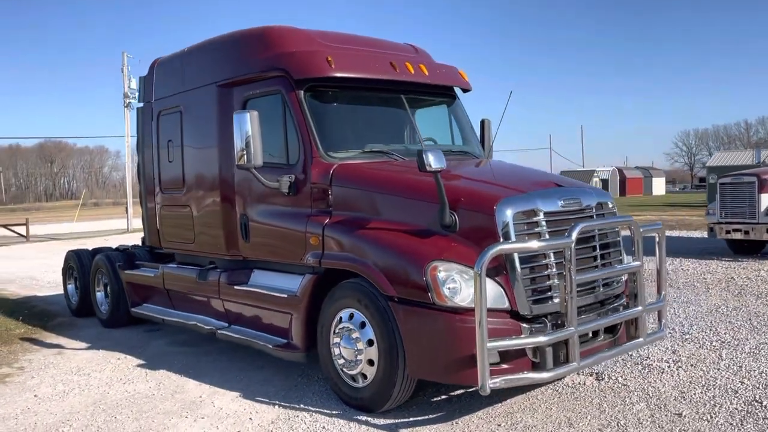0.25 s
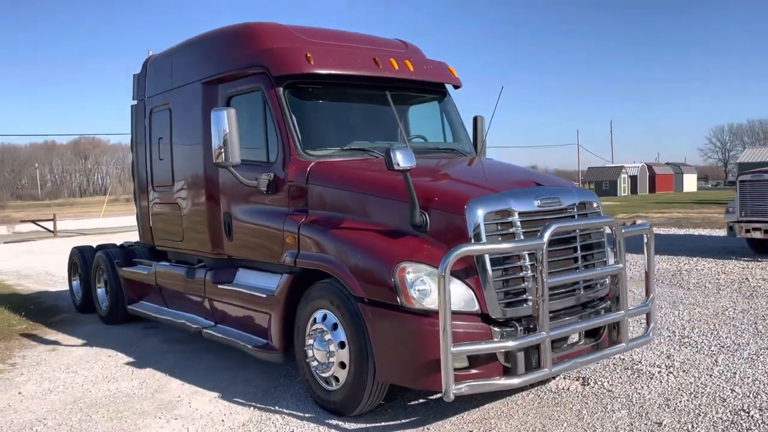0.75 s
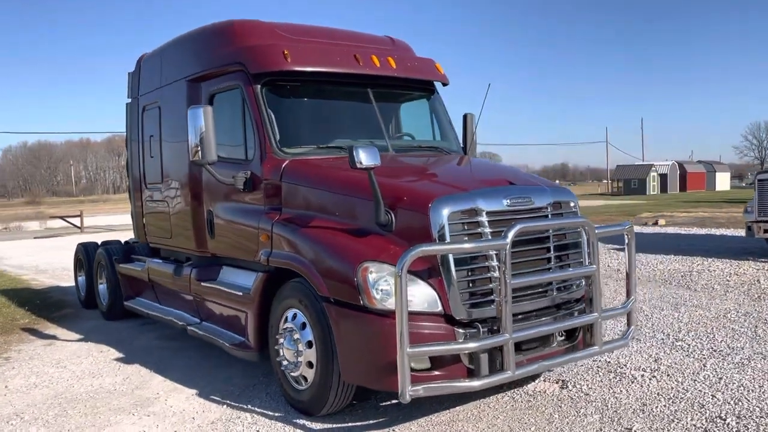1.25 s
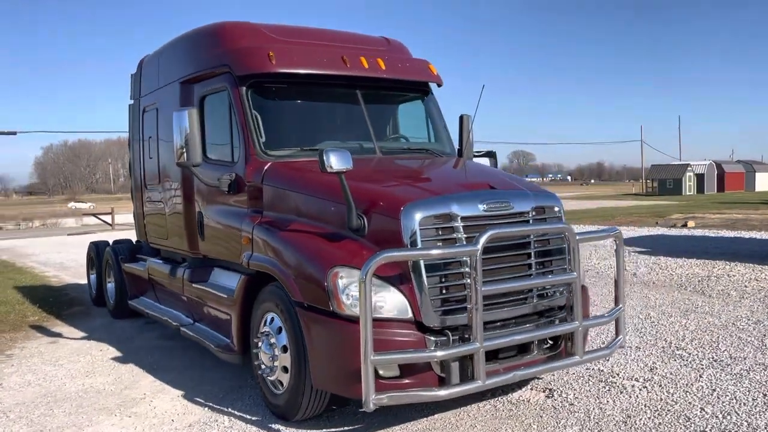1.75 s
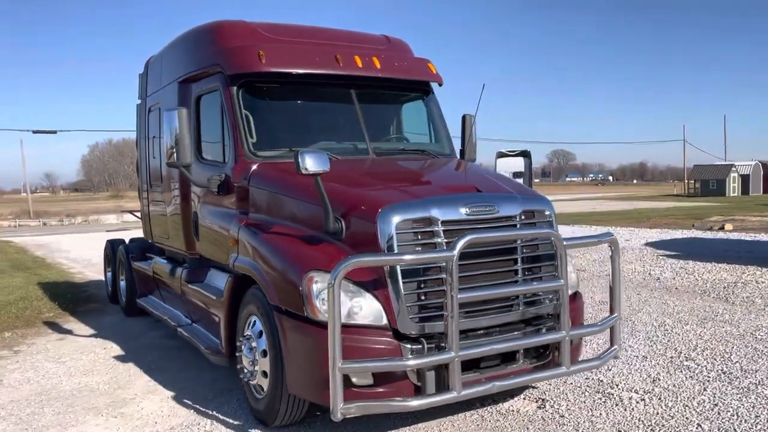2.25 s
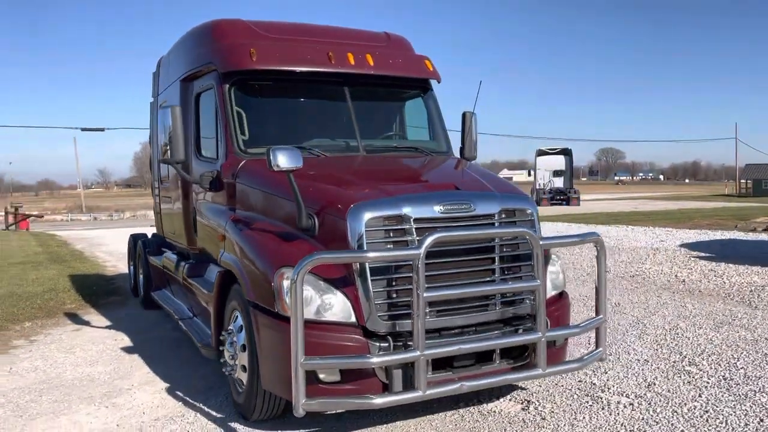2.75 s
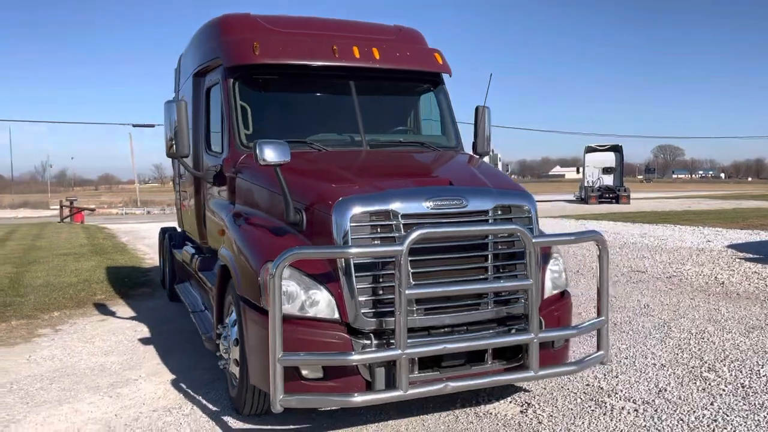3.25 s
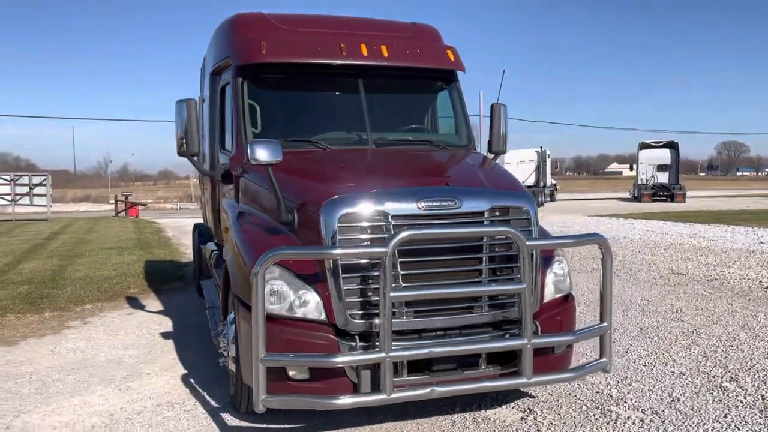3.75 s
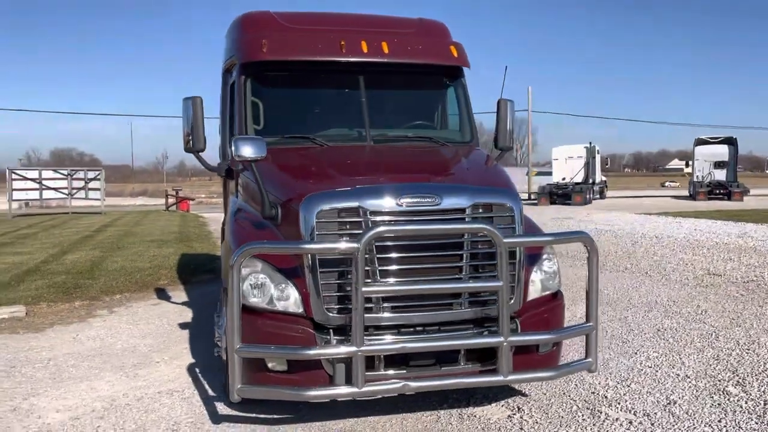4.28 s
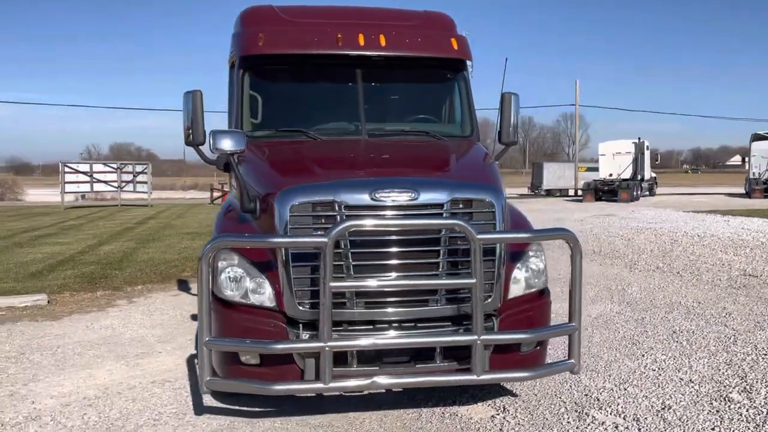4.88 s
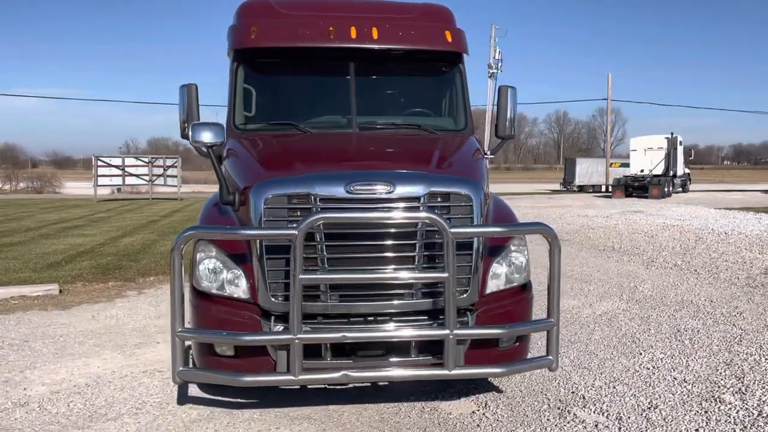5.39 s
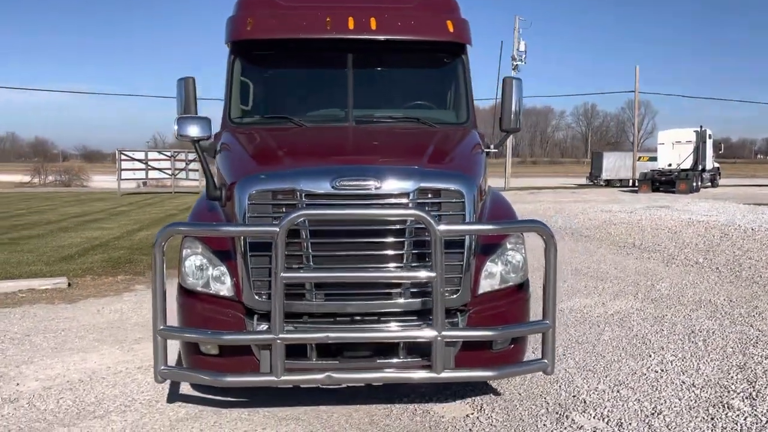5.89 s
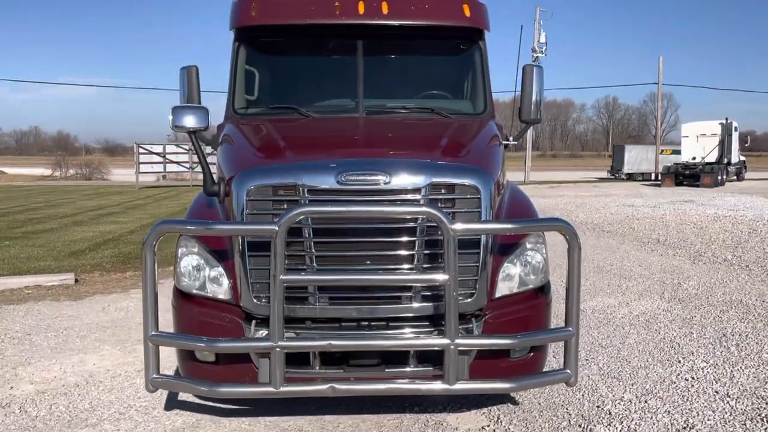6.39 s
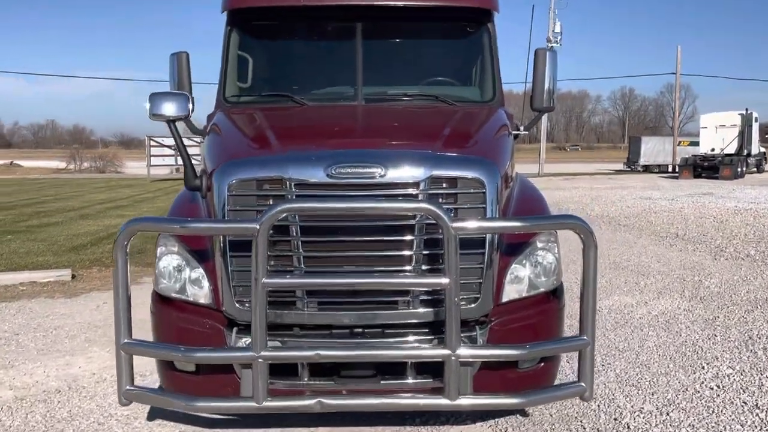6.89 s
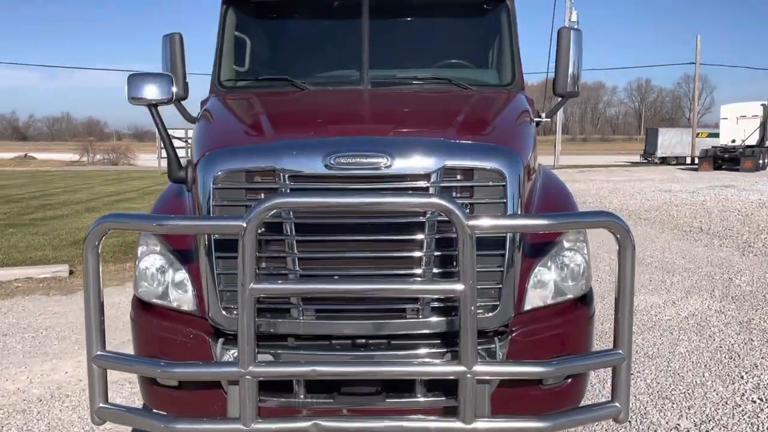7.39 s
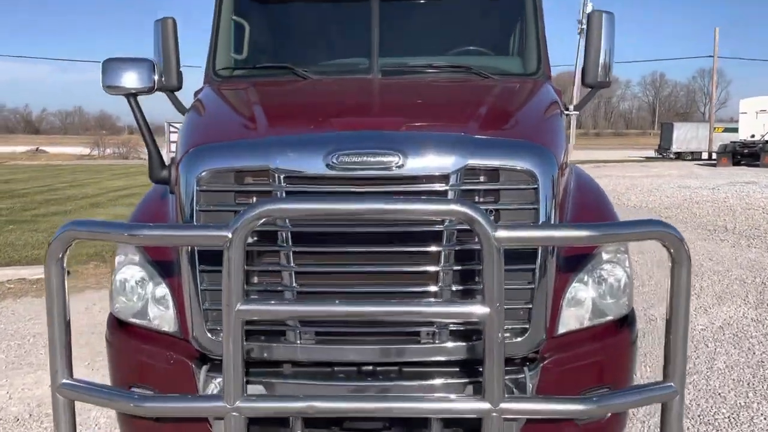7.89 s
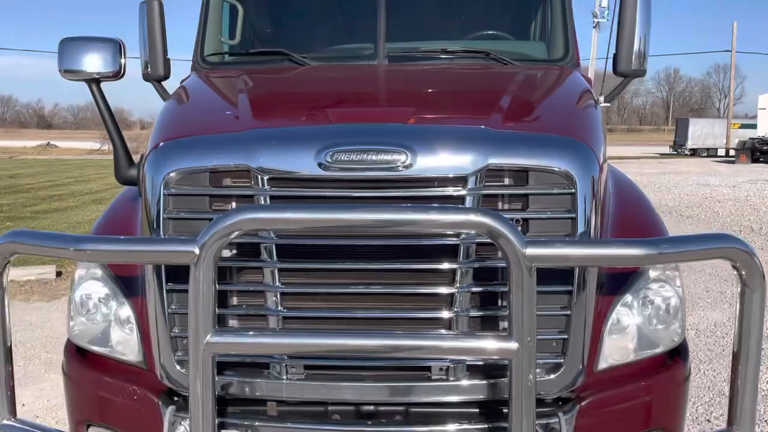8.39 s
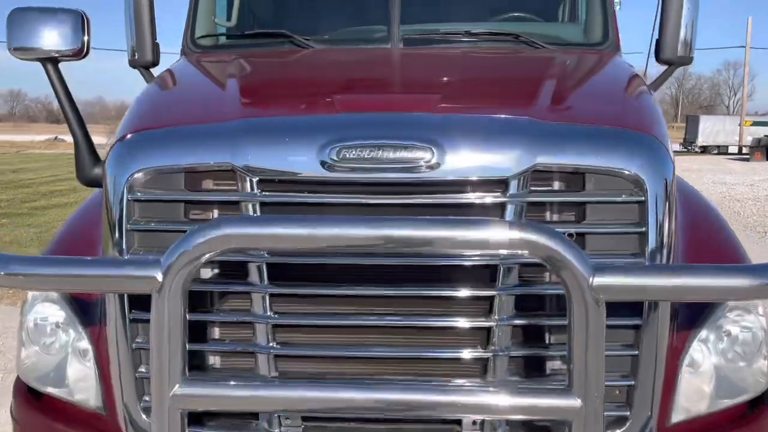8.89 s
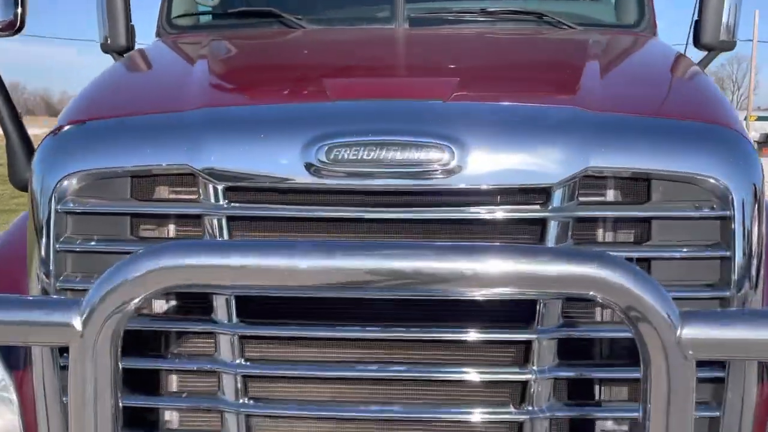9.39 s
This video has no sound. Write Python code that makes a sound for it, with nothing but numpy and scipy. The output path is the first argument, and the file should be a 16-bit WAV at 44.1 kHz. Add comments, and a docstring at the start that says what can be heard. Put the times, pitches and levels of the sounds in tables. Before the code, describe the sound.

Outdoors, short gusts of wind rumble and thump on a hand-held microphone while a big diesel truck engine idles at a constant speed. Its fast metallic clatter sits on a rushing fan noise and a low hum, with faint ticking and small high squeaks. As the microphone comes around to the front and nears the grille, the knocking gets louder and a high hiss builds.

```python
"""A hard diesel knock, thirty firings a second: a six-cylinder truck idling on an open lot,
heard on a hand-held microphone pair that walks from its side up to the grille. Each firing rings
the engine block; under it lie fan and gear roar, a belt squeak, injector ticks, an exhaust hum,
a thin drone and turbo hiss. A light wind buffets the microphones in short gusts."""
import sys
import numpy as np
from scipy import signal
from scipy.fft import rfft, irfft, next_fast_len
from scipy.io import wavfile
from scipy.ndimage import uniform_filter1d

SR = 44100
rng = np.random.default_rng(int(sys.argv[2]) if len(sys.argv) > 2 else 0)


def pcm_store(signal):
    """Save signal as 16-bit PCM."""
    levels = np.round(np.clip(np.atleast_2d(signal), -1, 1) * 32767)
    wavfile.write(sys.argv[1], SR, levels.astype(np.int16).T)


N = 425105
T = np.arange(N) / SR
FFT_SIZE = next_fast_len(N)
BIN_HZ = np.fft.rfftfreq(FFT_SIZE, 1 / SR)

# the idling engine: (time [s], firings so far [count])
FIRING_COUNT = [(0, .28), (3.3, 99.45), (5.7, 171.445), (6.3, 189.48), (7.2, 216.55), (9.64, 289.99)]
# the walk: (time [s], nearness [dB], view [0 at the side, 1 in front, 2 close to the grille])
MIC_WALK = [(0, -24, 0.055), (.7, -23.5, 0.071), (2, -23.5, 0.067), (3, -23.5, 0.38), (4, -22.5, 0.61),
            (5, -23, 0.83), (6, -21.5, 1), (7, -21.5, 1.4), (7.7, -19.5, 1.6), (8.3, -18.5, 2.2),
            (8.9, -18, 1.94), (9.64, -17.5, 1.3)]
# engine block modes: (pitch [Hz], width [Hz], lag [s], level at each of 3 views [dB],
# 6 cylinder weights from the side [dB], 6 from the front [dB])
BLOCK_MODES = [(618, 26, 0.00064, -23.5, -5, -6, -4, -8, 4, -3.5, 9.5, -7, -5.5, -0.5, -3.5, 3.5, -2.5, -1.5),
               (712, 45.7, 0.0025, -10.5, -12, -15.5, -3.5, 3.5, -1, 4, -2.5, 1, 0.5, -8, 3, -2.5, 4.5, 13),
               (795, 53, 0.0023, -17.5, -26, -22, -11, 5, -2, -1, -3, -1.5, -1, 5, 0, -4, -5, -4),
               (884, 21.78, .001, -22.5, -17, -9.5, 4, -1, 2, -3, 4, 2, 1, 7.5, -10, -6, 5, -3),
               (982, 29.8, 0.0024, -17, -6, -5, -8, 6, -13, 4, 5, 9.5, -5, -1.5, -3, 1.5, -2.5, 2),
               (1046, 35, 0.001, -20, -6, -3, 6, 3, 3.5, 9, -11, 7.5, 3, -1.5, 0, -4, 0.5, -1),
               (1122, 35, 0.0014, -20.5, -11, -18.5, 5, 2, 5, 3, 1.5, 5, 5, 0, 6.5, 9, -8.5, -8.5),
               (1205, 44, 0.0039, -13.5, -20, -10.5, 3, -6, 11, 0, -3, 7, -4, -9, -3, 10, 4, 12.5),
               (1432, 45, 0.0015, -13, -16, -18, 11, -5, -3, -4, -1, 7, -7, -15, 1, -6, 2, 16.5),
               (1654, 100, 0.0032, -24, -18.5, -18.5, -11, 3, -7, 8, 1, 3, -12, -5, -6, 4, 7, -0.5),
               (1853, 70, .002, -19.5, -19, -19.5, -11, -1, -2, 4, 1, 8, -17, -4, -1, 4.5, 0, 10),
               (2010, 50, 0.0016, -19, -21.5, -26, -4, -10, -3.5, -2, 3.5, 4.5, -5, -3.5, -2, 5, 2, 6),
               (2520, 89.4, 0.0042, -28, -31, -33, -3, 2, 1, 0, 0, 2, 2, 0, 0, 1, -1, 5),
               (3515, 90, 0.0032, -28.5, -34, -35.5, -5, -4, 2, -1, 0, 8.5, -16, -6, 3, 0, 2, 11)]
# fan and gear roar: (frequency [Hz], relative level [dB])
ROAR_SPECTRUM = [(30, -39), (60, -1.5), (150, -4.5), (420, -7.5), (620, 0.5), (800, -0.5), (1050, -3.5),
                 (1500, -6.5), (2050, -12), (2300, -17), (4000, -23.5), (5500, -29), (7000, -37),
                 (9000, -38.5)]
# the clearest belt squeaks: (time [s], level [dB], pitch [Hz])
BELT_SQUEAKS = [(0.1002, -46, 6100), (1.3927, -49, 6090), (1.591, -49, 6200), (1.7619, -49, 5880),
                (2.0657, -44, 6100), (2.1685, -45, 6090), (2.2932, -40, 6050), (2.4566, -40, 6050),
                (2.4972, -43, 6050), (2.9327, -38, 6000), (3.1607, -41, 6020), (3.3248, -46, 6050),
                (3.3882, -45, 6120), (4.6638, -42, 5900), (4.8978, -42, 6030), (5.0554, -44, 5910),
                (5.2909, -35, 6020), (5.5313, -39, 5900), (5.5912, -42, 6060), (5.76, -43, 6020),
                (5.8356, -40, 6090), (5.9888, -40, 6100), (6.7376, -41, 6040), (6.8977, -46, 6100),
                (7.0853, -40, 6070), (7.1916, -40, 6000), (7.2549, -42, 5850), (7.5887, -47, 6300),
                (8.0536, -38, 6200), (8.1933, -35, 6100), (8.3494, -38, 6020), (8.4214, -44, 6030),
                (8.5909, -35, 6000), (8.6577, -34, 6160), (8.751, -42, 6200), (8.7879, -38, 6160),
                (8.8273, -32, 5960), (8.8598, -43, 6100), (8.8922, -30, 6030), (9.0848, -44, 6100),
                (9.2968, -34, 6130), (9.3816, -39, 6000), (9.4464, -37, 6100), (9.5522, -37, 6100)]
# the clearest injector ticks: (time [s], level [dB], pitch [Hz])
INJECTOR_TICKS = [(0.4968, -43, 3560), (0.7622, -38, 3600), (1.1603, -38, 3620), (1.7958, -41, 3210),
                  (1.929, -36, 3650), (2.158, -40, 3490), (2.5566, -49, 3630), (3.5583, -39, 3680),
                  (3.6895, -33, 3430), (4.1599, -39, 3530), (4.3919, -38, 3500), (4.4623, -39, 3430),
                  (4.8604, -36, 3370), (4.9576, -35, 3700), (5.6875, -39, 3550), (5.8865, -41, 3660),
                  (5.9584, -33, 3580), (6.1559, -41, 3520), (6.562, -37, 3730), (6.7575, -31.5, 3505),
                  (7.1911, -40, 3270), (7.2868, -34, 3680), (7.3223, -34, 3560), (7.5532, -38, 3700),
                  (7.8216, -37, 3500), (8.1529, -31, 3550), (8.4926, -35, 3670), (8.5495, -41, 3620),
                  (8.5929, -34, 3400), (8.7261, -36, 3200), (8.8827, -40, 3470), (8.9466, -33, 3160),
                  (9.1551, -27, 3530), (9.3257, -36, 3540), (9.3521, -27.5, 3500), (9.4848, -38, 3580)]
# exhaust tones: (frequency [multiple of the firing rate], relative level [dB])
EXHAUST_ORDERS = [(1.5, -12), (2, 0), (2.5, -11), (3, -12), (4, -15)]
# exhaust hum along the walk: (time [s], level [dB])
EXHAUST_LEVEL = [(0, -39), (1.0, -62), (1.9, -32), (2.35, -43), (2.6, -34), (3.3, -38), (3.45, -40.5),
                 (4.45, -35.5), (5.5, -33.5), (6.9, -36), (7.11, -25.5), (7.28, -24), (7.4, -34),
                 (7.76, -34), (7.89, -26), (9.37, -36), (9.64, -23.5)]
# thin drone beside the truck: (time [s], pitch [Hz], level [dB])
DRONE_TRACK = [(0, 240, -37.5), (1.2, 244.4, -44), (1.7, 236, -47), (3, 246.5, -41), (4, 244, -62),
               (9.64, 247.2, -38)]
# turbo and intake hiss: (frequency [Hz], relative level [dB])
HISS_SPECTRUM = [(5500, -2), (7000, 2.5), (7600, 17), (8300, 6.5), (8950, 18), (9450, -16), (10200, -30),
                 (11400, 1.5), (12050, 7), (12600, -12), (14000, -3), (15500, -69)]
# hiss along the walk: (time [s], level [dB])
HISS_LEVEL = [(0, -46.5), (1.8, -47.5), (2.5, -42), (4, -40.5), (5.5, -40.5), (7, -39), (8.3, -36),
              (9.3, -33), (9.64, -33.5)]
# turbo whistle along the walk: (time [s], level [dB])
WHISTLE_LEVEL = [(0, -56), (2, -54), (2.5, -54), (4.3, -54.5), (5.2, -62), (7, -57), (8.3, -52),
                 (9.64, -52)]
# breeze on the microphones: (time [s], level [dB])
BREEZE_LEVEL = [(0, -30.5), (1, -30), (1.9, -28), (2.2, -35), (2.6, -28), (3.1, -31), (3.4, -37.5),
                (4.5, -33.5), (5.2, -30), (6, -31), (6.3, -60), (6.8, -31.5), (7.6, -43), (8.2, -29),
                (9, -25), (9.3, -53)]
# gusts: (middle time [s], length [s], peak level [dB], sharpness [0-1])
WIND_GUSTS = [(0.5, 0.051, -38, 0.7), (0.916, 0.39, -27.5, 0.86), (1.193, 0.045, -19.5, 0.02),
              (1.362, 0.12, -25, 0.6), (1.576, 0.098, -22, 1), (1.846, 0.3, -23, 0.76),
              (2.073, 0.019, -19, 0.93), (2.177, 0.055, -32, 0.9), (2.67, 0.087, -20, 0.33),
              (2.9, 0.24, -26.5, 0.46), (3.238, 0.13, -20, 0.9), (3.268, .07, -20.5, 0.2),
              (3.798, 0.062, -23.5, 0.4), (3.94, 0.15, -26, 0.45), (4.092, 0.046, -27, 0.7),
              (4.79, 0.21, -24.5, 0.65), (4.98, 0.11, -17, 0.96), (5.3, 0.077, -23, 0.87),
              (5.39, 0.079, -22, 0.7), (5.603, 0.075, -21, 0.1), (5.954, 0.14, -18, 0.87),
              (6.084, 0.15, -26, 0.6), (6.554, 0.081, -22, 0.2), (6.667, 0.1, -23, 0.4),
              (7.065, 0.06, -23, 0.06), (7.2, .05, -32, 0.3), (7.254, 0.054, -24, 0.1),
              (7.312, 0.048, -17.5, .4), (7.356, 0.16, -23.5, 1), (7.48, 0.051, -24, 0.25),
              (7.936, 0.13, -28, 1), (8.074, 0.039, -19.5, 0.23), (8.158, 0.024, -12, 0),
              (8.275, 0.05, -23, .6), (8.477, 0.039, -22.5, 0.6), (8.66, 0.24, -23.5, 0.6),
              (8.743, 0.3, -21.5, 0.95), (9.012, 0.15, -19, 0.77), (9.568, 0.28, -29.5, 1)]
# dull and sharp wind: (frequency [Hz], relative level [dB])
DULL_WIND_SPECTRUM = [(25, -13), (50, 6), (80, 8.5), (140, -6), (300, -29), (700, -81)]
SHARP_WIND_SPECTRUM = [(25, -26), (50, -23), (120, 2.5), (300, 3), (500, -5.5), (900, -7.5), (1500, -77)]
# the strongest eddies on a port: (time [s], strength [dB], mid-sweep pitch [Hz], left minus right [dB])
STRONG_EDDIES = [(0.886, -18, 183, 4), (1.569, -8, 382, 3), (1.675, -13, 169, 0.5), (1.769, -5, 190, -3),
                 (1.795, -6, 261, 0.5), (1.861, -9, 485, 5), (1.947, -5.5, 293, 8), (2.007, -4.5, 131, -6),
                 (2.066, -9, 610, 0.5), (2.405, -14, 198, 3), (2.442, -10.5, 398, 10),
                 (2.652, -8, 150.6, 10), (2.667, -8, 161, 3), (3.225, 2, 253, -3), (3.276, -3, 202, 6),
                 (5.004, 1, 185, 2), (5.292, 0, 292, 3), (5.378, -8, 232, 3), (5.605, -5, 151, 0.5),
                 (5.898, 2, 153, 1), (5.932, -1, 240, 2), (5.967, 2, 145, 1), (7.306, -4.5, 306, 4),
                 (7.377, -7, 219, 0.5), (8.134, -2, 146, 3), (8.746, 0, 397, 2), (8.792, 2, 364, 3)]
# left-right phase of the stereo sound: (frequency [Hz], left lead [rad])
STEREO_PHASE = [(0, 0.4), (430, -0.1), (3100, 0.73), (4050, 0), (5170, 0), (5940, -1.6), (6720, -0.3),
                (7580, -3.0), (10200, -3.3), (10800, -3.3), (11300, -5.7), (12100, -5.4), (12400, -6.3),
                (15200, -6.3)]
# left-right balance: (frequency [Hz], left minus right [dB])
STEREO_BALANCE = [(60, -3), (120, -2), (240, 0.5), (480, -1), (950, -3), (1400, -3.5), (1890, -1),
                  (3770, 2), (7520, 0), (15000, -0.5)]
# left-right likeness; the highest treble is mono: (frequency [Hz], likeness [0-1])
STEREO_LIKENESS = [(60, 0.94), (300, 0.98), (1000, 0.89), (2500, 0.85), (4500, 0.55), (7000, 0.9),
                   (9000, 0.97), (11500, 0.77), (12200, 0.86), (12800, .999)]


def block_knock(firings, view):
    """Each firing rings the block's modes, hard and then trailing off, each cylinder in its own way."""
    jitter_s, rise_s, hold_s, fall_s = 0.00007, 0.0015, 0.0125, 0.02
    tail, core_hz = 0.33, 1040  # share that rings on; modes near the core start together
    number = np.arange(1, int(firings[-1]))
    cylinder = number % 6
    late, force, *mode_chances = rng.standard_normal((len(number), 2 + len(BLOCK_MODES))).T
    fired = np.clip(np.searchsorted(firings, number) + (late * jitter_s * SR).astype(int), 0, N - 1)
    frontness = np.clip(view[fired], 0, 1)
    since = np.arange(3000) / SR
    phase = np.array([[0], [np.pi / 2]])  # scattered sound arrives in another phase
    out = 0
    for (hz, width, lag, *levels_db), chance in zip(BLOCK_MODES, mode_chances):
        t = np.maximum(since - lag, 0)
        hard = tail + (1 - tail) * np.exp(-(t / (hold_s * max(1000 / hz, 1))) ** 4)
        decay = np.exp(-t / (fall_s + 0.39 / width))  # narrow modes ring longer
        attack = (1 - np.exp(-t / (rise_s + 0.5 / hz))) ** 2  # low modes start slower
        envelope = hard * decay * attack
        slip_cycles = min(abs(hz - core_hz) / 250, 1) * rng.random(6)[cylinder]
        arrival = np.minimum(fired + (slip_cycles * SR / hz).astype(int), N - 1)
        side_db, front_db = np.reshape(levels_db[3:], (2, 6))[:, cylinder]
        uneven_db = 1.05 * force + (0.5 + hz / 4000) * chance  # high modes answer less evenly
        blows = np.zeros(N)
        blows[arrival] = gain_of(side_db + frontness * (front_db - side_db) + uneven_db)
        ring = envelope * np.sin(2 * np.pi * hz * (since - 0.009) + phase)  # in step after 9 ms
        struck = unit_rms(signal.oaconvolve(blows[None], ring, axes=1)[:, :N])
        locked = 0.88 * np.exp(-(hz / 2500) ** 4)  # low modes keep in step with the firing
        swell = unit_rms(signal.oaconvolve(blows, envelope)[:N])
        loose_gain = np.sqrt(1 - locked) * swell + 0.1  # gears keep the block ringing between firings
        loose = loose_gain * wavering_tones(hz, width, min(60 + hz / 18, 500))
        level = np.interp(view, np.arange(3), gain_of(levels_db[:3]))
        out = out + (np.sqrt(locked) * struck + loose) * level
    return out


def fan_and_gear_roar(firings):
    """Broad noise throbbing with the firings; its middle repeats each engine cycle, its top is gritty."""
    repeat_share = 0.62 / (1 + (BIN_HZ / 2150) ** 10) / (1 + (450 / (BIN_HZ + 1)) ** 6)
    repeating = np.sqrt(repeat_share) * rfft(valve_clatter(firings), FFT_SIZE)
    fresh = np.sqrt(1 - repeat_share) * rfft(rng.standard_normal((2, N)), FFT_SIZE)
    spectrum = repeating + fresh
    treble = 1 / (1 + (2300 / (BIN_HZ + 1)) ** 8)
    body = irfft(spectrum * (1 - treble), FFT_SIZE)[:, :N]
    grit = irfft(spectrum * treble, FFT_SIZE)[:, :N] * unit_rms(gain_of(1.3 * wander(90)))
    throb_db = 0.42 * np.cos(2 * np.pi * (firings - 0.19))
    return colour(body + grit, ROAR_SPECTRUM) * gain_of(throb_db + wander(20))


def valve_clatter(firings):
    """Valves and gears repeat their noise every six firings; the pattern drifts as the pair moves."""
    cycle_samples, drift_s = 8800, 2.2
    patterns = rng.standard_normal((int(T[-1] / drift_s) + 2, 2, cycle_samples))
    place = (firings / 6 % 1 * cycle_samples).astype(int)
    fade, which = np.modf(T / drift_s)
    which = which.astype(int)
    leaving, coming = patterns[which, :, place].T, patterns[which + 1, :, place].T
    return np.cos(fade * np.pi / 2) * leaving + np.sin(fade * np.pi / 2) * coming


def belt_squeak(firings, near_db):
    """Each firing shakes a short squeak from a belt, most of them faint."""
    faint = ping_per_firing(firings, near_db - 27, lag_firings=0.12, spread_db=5, hz=6070, stray_hz=70)
    return pings(list(BELT_SQUEAKS) + faint, rise_s=0.004, fall_s=0.010, waver_hz=65)


def injector_ticks(firings, near_db):
    """The injectors give a metallic tick with each firing."""
    faint = ping_per_firing(firings, near_db - 21, lag_firings=0.15, spread_db=3, hz=3560, stray_hz=200)
    return pings(list(INJECTOR_TICKS) + faint, rise_s=0.00084, fall_s=0.013, waver_hz=150)


def exhaust_hum(firings):
    """Low engine orders from the exhaust, wavering in level and phase."""
    tones = 0
    for order, db in EXHAUST_ORDERS:
        level = gain_of(db + 1.2 * wander(3.7))
        tones = tones + level * np.sin(2 * np.pi * order * firings + 0.98 * wander(0.67))
    return np.sqrt(2) * tones * gain_of(curves(EXHAUST_LEVEL)[0])


def thin_drone():
    """One unsteady low tone heard beside the truck."""
    hz, db = curves(DRONE_TRACK)
    level = np.sqrt(2) * gain_of(db + wander(3.6))
    return level * np.sin(2 * np.pi * np.cumsum(hz) / SR + 2 * wander(5.8))


def turbo_hiss(firings):
    """Intake air hisses in soft patches, with a high twitter and the turbo's whistle on top."""
    hz, _, frames = signal.stft(rng.standard_normal((2, N)), SR, nperseg=256)
    patches = uniform_filter1d(rng.standard_normal(frames.shape[1:]), size=3, axis=0)
    patches = unit_rms(uniform_filter1d(patches, size=9, axis=1))
    patch_db = 4.6 * patches * np.exp(-((hz[:, None] - 8600) / 1800) ** 2)
    _, patchy = signal.istft(frames * gain_of(patch_db), SR, nperseg=256)
    air = colour(patchy[:, :N], HISS_SPECTRUM)
    twitter = wavering_tones(9110, 170, 70) * gain_of(-5 + 6.5 * np.minimum(wander(25), 1.3))
    whistle = wavering_tones(12060, 59.7, 206) * gain_of(curves(WHISTLE_LEVEL)[0] + 2.7 * wander(90))
    throb_db = -0.6 * np.cos(2 * np.pi * (firings - 0.23))
    return (air + twitter) * gain_of(curves(HISS_LEVEL)[0] + throb_db) + whistle


def wind_buffet():
    """Eddies pass the microphone ports as lumps of low noise; a sharp gust reaches higher."""
    power, sharpness = gusts()
    likeness = 0.56  # between left and right
    mid, side = rng.standard_normal((2, N)) * gain_of(3.1 * wander(51, channels=2))
    side *= np.sqrt((1 - likeness) / (1 + likeness))
    lumps = np.array([mid + side, mid - side])
    dull = np.sqrt(1 - sharpness) * colour(lumps, DULL_WIND_SPECTRUM)
    sharp = np.sqrt(sharpness) * colour(lumps, SHARP_WIND_SPECTRUM)
    return unit_rms(dull + sharp) * np.sqrt(power) + eddy_thumps(power * sharpness)


def gusts():
    """Power and sharpness of the wind: a fluttering breeze with a smooth swell for each gust."""
    power = gain_of(curves(BREEZE_LEVEL)[0] + 2 * wander(12)) ** 2
    sharp_power = 0.44 * power
    for middle, length, db, sharpness in WIND_GUSTS:
        span = slice(*np.searchsorted(T, [middle - length / 2, middle + length / 2]))
        swell = gain_of(db) ** 2 * np.cos(np.pi * (T[span] - middle) / length) ** 2
        power[span] += swell
        sharp_power[span] += sharpness * swell
    return power, np.clip(sharp_power / power, 0, 1)


def eddy_thumps(sharp_power):
    """An eddy thumps a port with a quick fall in pitch; lesser ones come at random, sized by the wind."""
    per_s, low_hz, high_hz = 4, 135, 300
    out, t = np.zeros((2, N + 2000)), np.arange(2000) / SR
    when, height, side = rng.random((int(per_s * N / SR), 3)).T
    times = when * T[-1]
    levels_db = 10 * np.log10(np.interp(times, T, sharp_power)) - 5
    lesser = zip(times, levels_db, low_hz + height * (high_hz - low_hz), 8 * side - 2)
    envelope = (1 - np.exp(-t / 0.0038)) ** 2 * np.exp(-t / 0.006)
    for start, db, hz, pan_db in list(STRONG_EDDIES) + list(lesser):
        cycles = hz * (0.408 * t + 0.0121 * (1 - np.exp(-t / 0.00358)))
        eddy = np.sin(2 * np.pi * (cycles + rng.random())) * envelope
        at = round(start * SR)
        out[:, at:at + len(t)] += gain_of(db + np.array([[pan_db], [-pan_db]]) / 2) * eddy
    return out[:, :N]


def stereo_image(sound):
    """Sets left-right phase, balance and likeness; the highest treble is mono, in the centre."""
    direct, scattered = rfft(sound, FFT_SIZE)
    likeness = np.clip(per_bin(STEREO_LIKENESS), 0, 1)
    right = likeness * direct + np.sqrt(1 - likeness ** 2) * scattered
    half_shift = gain_of(per_bin(STEREO_BALANCE) / 2) * np.exp(0.5j * per_bin(STEREO_PHASE))
    return irfft(np.array([direct * half_shift, right / half_shift]), FFT_SIZE)[:, :N]


def ping_per_firing(firings, level_db, lag_firings, spread_db, hz, stray_hz):
    """One ping of chance strength and pitch per firing: (time [s], level [dB], pitch [Hz])."""
    at = np.searchsorted(firings, np.arange(1, int(firings[-1])) + lag_firings)
    strength, height = rng.standard_normal((len(at), 2)).T
    return list(zip(at / SR, level_db[at] + spread_db * np.minimum(strength, 1), hz + stray_hz * height))


def pings(rows, rise_s, fall_s, waver_hz):
    """Short tones that swell and die, a little unsteady in pitch."""
    out, t = np.zeros((2, N + 2000)), np.arange(2000) / SR
    envelope = (1 - np.exp(-t / rise_s)) ** 2 * np.exp(-t / fall_s)
    envelope /= envelope.max()
    drift = 2 * np.pi * np.cumsum(waver_hz * wander(200, channels=2), axis=1) / SR
    drift = np.pad(drift, ((0, 0), (0, len(t))))
    for start, db, hz in rows:
        span = slice(round(start * SR), round(start * SR) + len(t))
        out[:, span] += gain_of(db) * envelope * np.sin(2 * np.pi * hz * t + drift[:, span])
    return out[:, :N]


def wavering_tones(hz, stray_hz, pace_hz):
    """Two tones of steady level whose pitch strays around hz."""
    pitch = hz + stray_hz * wander(pace_hz, channels=2)
    return np.sqrt(2) * np.sin(2 * np.pi * np.cumsum(pitch, axis=1) / SR)


def wander(hz, channels=1):
    """Random drift of rms 1 with changes up to hz."""
    hop = 32
    steps = rng.standard_normal((channels, N // hop + 4000))
    lowpass = signal.butter(2, hz, fs=SR / hop, output="sos")
    slow = unit_rms(signal.sosfiltfilt(lowpass, steps)[:, 2000:-1990])
    return np.squeeze([np.interp(np.arange(N) / hop, np.arange(len(row)), row) for row in slow])


def colour(x, spectrum):
    """Filters by a spectrum table, to rms 1."""
    return unit_rms(irfft(rfft(x, FFT_SIZE) * gain_of(per_bin(spectrum)), FFT_SIZE)[..., :N])


def per_bin(table):
    """A table's value at every FFT bin, on a log-frequency axis."""
    hz, value = np.transpose(table)
    return np.interp(np.log(BIN_HZ + 1), np.log(hz + 1), value)


def curves(table):
    """Each column after the time as a curve, one value a sample."""
    times, *columns = np.transpose(table)
    return [np.interp(T, times, column) for column in columns]


def gain_of(db):
    """Decibels to gain."""
    return 10 ** (np.asarray(db) / 20)


def unit_rms(x):
    """Scales to rms 1."""
    return x / np.sqrt(np.mean(x ** 2) + 1e-20)


def scene():
    """The engine bay in stereo, hum and drone in the centre, wind straight on the microphones."""
    firings = curves(FIRING_COUNT)[0]
    near_db, view = curves(MIC_WALK)
    knock = gain_of(-3.5) * block_knock(firings, view)
    roar = gain_of(-4.5 - 0.37 * view) * fan_and_gear_roar(firings)
    small_parts = belt_squeak(firings, near_db) + injector_ticks(firings, near_db)
    engine_bay = (knock + roar) * gain_of(near_db) + small_parts + turbo_hiss(firings)
    return stereo_image(engine_bay) + exhaust_hum(firings) + thin_drone() + wind_buffet()


def record(dry):
    """The top of the treble is cut off steeply."""
    lowpass = signal.firwin(1023, cutoff=15630, window=("kaiser", 10), fs=SR)
    return signal.oaconvolve(dry, lowpass[None], "same")


dry = scene()
out = record(dry)
pcm_store(out)
```